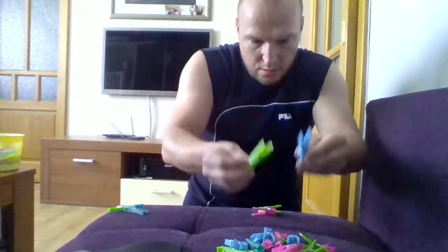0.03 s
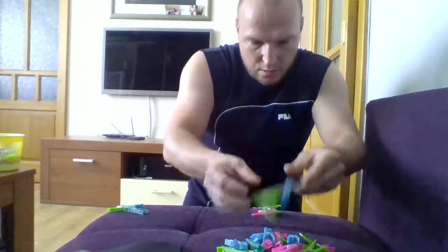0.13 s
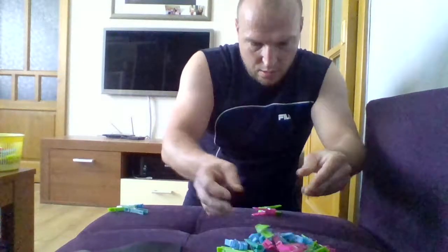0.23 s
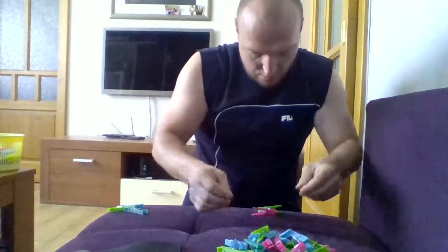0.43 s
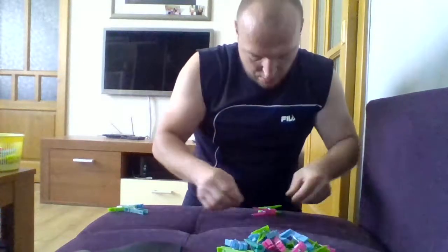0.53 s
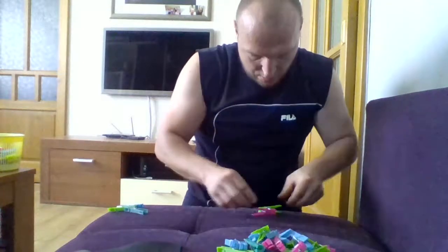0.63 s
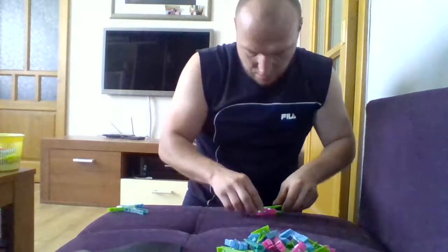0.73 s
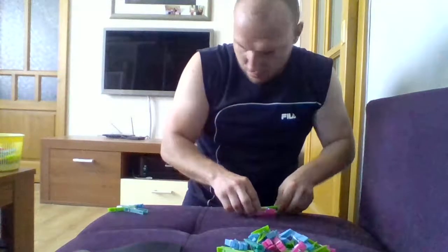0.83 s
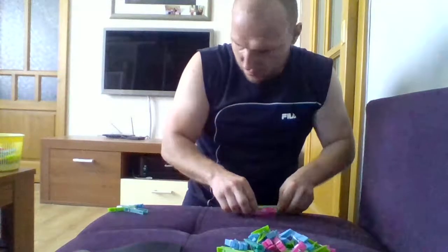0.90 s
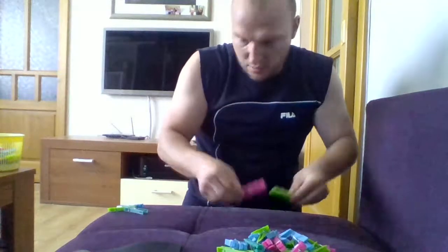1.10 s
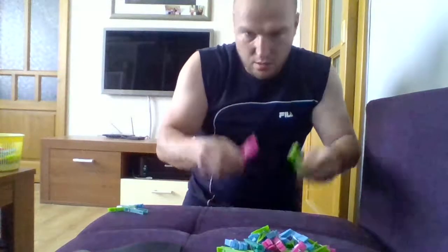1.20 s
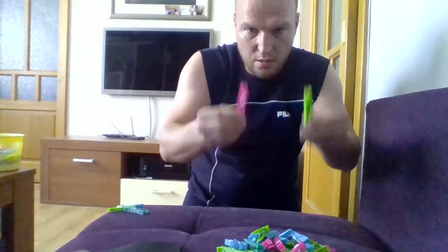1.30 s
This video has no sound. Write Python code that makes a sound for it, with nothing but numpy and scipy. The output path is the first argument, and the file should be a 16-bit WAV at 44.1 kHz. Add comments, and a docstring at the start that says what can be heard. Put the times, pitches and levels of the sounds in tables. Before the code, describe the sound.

Plastic clothes pegs fall onto a heap of pegs on a sofa. Faint hiss and low buzz come first, with tiny ticks at 0.15 seconds. From 0.20 to 0.25 a dense burst of hard, bright clacks rattles, with a dull cushion thud beneath. Weaker clicks follow until 0.39. A bright living-room tail and low murmur fade by about 0.7, leaving quiet hiss, heard through a small, dull-topped microphone.

```python
"""Plastic clothes pegs drop onto a heap of pegs on a sofa, a metre from a small camera microphone.
They clack and rattle as gritty contacts ring their modes; damped low sines make the cushion thud.
The living room answers with a bright tail of decaying noise bands, and low resonances murmur on.
Underneath lie a faint buzz of filtered pulses at the camera's frame rate, steady noise hiss,
whines of narrow-band noise and a few faint rings."""
import sys
import numpy as np
from scipy import signal
from scipy.io import wavfile

SR = 44100
rng = np.random.default_rng(int(sys.argv[2]) if len(sys.argv) > 2 else 0)


def unload_audio(sound):
    """Save the sound as a 16-bit wav file, at the path given as the first command line argument."""
    columns = np.transpose(np.atleast_2d(sound))
    # keep every value between -1 and 1, then stretch to whole-number steps
    steps = np.round(np.clip(columns, -1, 1) * 32767)
    wavfile.write(sys.argv[1], SR, steps.astype(np.int16))


N = 59535


def undb(db):
    """Decibels express an amplitude ratio as 20 times its logarithm."""
    return 10 ** (np.asarray(db) / 20)


def level(x, db):
    """The RMS amplitude is scaled to a level in dB."""
    return x * undb(db) / np.sqrt(np.mean(x ** 2))


def on_log(hz, table):
    """A table of frequency and value is interpolated along log frequency, as hearing spaces pitch."""
    table = np.array(table)
    return np.interp(np.log(hz), np.log(table[:, 0]), table[:, 1])


def fade(t, t60_s):
    """Exponential decay: the amplitude falls by 60 dB in each t60."""
    return np.exp(-np.log(1000) * t / t60_s)


def rise(t, rise_ms):
    """Exponential build-up towards full amplitude, with a time constant in ms."""
    return 1 - np.exp(-t * 1000 / rise_ms)


def add(out, at_s, x):
    """Superposition: sound pressures sum, here from a start time onwards."""
    i = int(at_s * SR)
    out[i:i + len(x)] += x[:len(out) - i]


def band(hz, size):
    """Band-limited noise: half an octave about a centre frequency, at unit RMS."""
    edges_hz = [hz / 2 ** (1 / 4), hz * 2 ** (1 / 4)]
    sos = signal.butter(2, edges_hz, "bandpass", fs=SR, output="sos")
    settle = 8192  # samples dropped while the filter settles
    return level(signal.sosfilt(sos, rng.standard_normal(size + settle))[settle:], 0)


BUZZ_HZ, BUZZ_DB, BUZZ_START_S = 30, -67, .0236
BUZZ_JITTER_MS, BUZZ_SCATTER_DB = 0.32, 0.98  # chance in each pulse's timing and level
BUZZ_DECAY_MS, BUZZ_LOW_HZ, BUZZ_HIGH_HZ = 2.4, 50, 150


def buzz():
    """Pulse train: a soft pulse leaks in once a frame; the steep bass cut smears it into a wobble."""
    lead_s = 1  # room ahead of the scene for the filters to settle
    count = int(N / SR * BUZZ_HZ) + 9
    chance, out = rng.standard_normal((count, 2)), np.zeros(N + 2 * SR)
    pulse = np.exp(-np.arange(SR // 50) / SR * 1000 / BUZZ_DECAY_MS)
    for k in range(count):
        jitter_s = BUZZ_JITTER_MS * chance[k, 0] / 1000
        at_s = lead_s + BUZZ_START_S + (k - 8) / BUZZ_HZ + jitter_s
        add(out, at_s, pulse * undb(BUZZ_SCATTER_DB * chance[k, 1]))
    out = signal.sosfilt(signal.butter(2, BUZZ_HIGH_HZ, fs=SR, output="sos"), out)
    out = signal.sosfilt(signal.butter(6, BUZZ_LOW_HZ, "high", fs=SR, output="sos"), out)
    return level(out[lead_s * SR:lead_s * SR + N], BUZZ_DB)


# Spectrum of the hiss. Each row: frequency in Hz, relative density in dB per Hz.
HISS = [(20, -4), (45, -1.5), (100, -1), (200, -2.5), (450, -11.5), (650, -22.5), (850, -18.5),
        (1100, -17.5), (1700, -19), (2300, -28.5), (3100, -24.5), (4000, -32.5), (6500, -30.5),
        (7600, -33.5)]
HISS_DB = -78.5


def hiss():
    """Shaped noise: half-octave bands of steady room and circuit noise, wider bands carrying more power."""
    out = np.zeros(N)
    for hz in 30 * 2 ** (np.arange(17) / 2):
        density = undb(on_log(hz, HISS))
        out += density * np.sqrt(hz) * band(hz, N)  # bandwidth grows with hz
    return level(out, HISS_DB)


# Narrow steady bands in the hiss. Each row: frequency in Hz, width in Hz, level in dB.
WHINES = [(860, 70, -98), (1680, 120, -101), (2613, 25, -106), (3151, 8, -106), (4850, 6, -114)]


def whines():
    """Resonant filtering: noise through a narrow peak becomes a faint, breathy, steady whine."""
    out = np.zeros(N)
    for hz, width_hz, db in WHINES:
        b, a = signal.iirpeak(hz, hz / width_hz, fs=SR)
        out += level(signal.lfilter(b, a, rng.standard_normal(N)), db)
    return out


def damped_modes(table):
    """Damped oscillation: each row sounds one decaying sine with a soft rise."""
    out, t = np.zeros(N), np.arange(SR // 2) / SR
    for at_s, db, hz, t60_ms in table:
        envelope = rise(t, 2.3) * fade(t, t60_ms / 1000)
        add(out, at_s, -undb(db) * envelope * np.sin(2 * np.pi * hz * t))
    return out


# Faint rings somewhere in the room.
# Each row: start in seconds, amplitude before rise and decay in dB, frequency in Hz, t60 in ms.
RINGS = [(.068, -74, 1770, 85), (.068, -64, 2793, 16), (.07, -79, 432.8, 540), (.505, -75.5, 1730, 80),
         (.755, -78, 1655, 60), (1.045, -76.5, 847, 180)]


def faint_rings():
    """Free vibration: each ring is a single damped mode."""
    return damped_modes(RINGS)


# Peg-on-peg clacks. Each row: start in seconds, RMS level in dB if packed into the rattle length,
# pitch of the favoured ring in Hz, rattle length in ms, weight of the low modes in dB.
CLACKS = [(0.1527, -57.5, 2565, 1.4, -19.5), (.1535, -54, 3350, 2.0, -21), (0.1531, -47, 7000, 2.5, -19.5),
          (0.154, -48, 5900, 2.3, -22.5), (0.2006, -22, 7100, 0.69, -9.5), (0.2027, -20.5, 4700, 1.2, -3),
          (0.2045, -24, 6300, .6, 1.5), (0.2065, -37, 6500, 1.7, 1), (.2120, -27.5, 6600, 1.3, 6),
          (.2140, -29, 4500, 1.2, 7.5), (0.2152, -33, 6800, 1.0, -1), (0.222, -20.5, 6900, .9, 8),
          (.2300, -35, 5500, 1.1, -4.5), (0.2355, -24.5, 6200, 0.54, -6), (0.2399, -40, 5000, 1.9, -3),
          (.2470, -36.5, 3300, 0.96, -9.5), (0.314, -41, 6300, 1.3, -25), (0.3549, -46.5, 4800, 2, 2),
          (0.3888, -51, 6250, 3, -4.5), (0.393, -70, 6200, 0.84, -14.5)]
# Modes of a peg. Each row: frequency in Hz, relative level in dB, t60 in ms.
PEG = [(850, -46.5, 16.1), (1270, -21, 11.4), (1578.5, -17.5, 16), (2200, -28, 14), (2790, -11, 11),
       (3557, -7.5, 4.9), (4150, -5.5, 6.8), (4753, -2.5, 8), (5750, 2.5, 4), (6320, -4, 24),
       (6610, 1, 2.5), (6835, -2.5, 4.1)]
FAVOUR_DB, FAVOUR_OCT = 9, .18  # lift of the modes near a clack's pitch, and its reach in octaves
SCATTER_DB, DETUNE = 2, 0.025  # chance in each mode's level and, as a fraction, its frequency
LOW_MODES_HZ = 2400


def pegs():
    """Modal excitation: a brief gritty contact rings the peg's modes, favouring those near its pitch."""
    out, t = np.zeros(N), np.arange(SR // 20) / SR
    hz, db, t60_ms = np.array(PEG).T[:, :, None]
    for at_s, level_db, pitch_hz, rattle_ms, low_db in CLACKS:
        level_chance, pitch_chance = rng.standard_normal((2, len(PEG), 1))
        octaves_off = np.log2(hz / pitch_hz)
        favour_db = FAVOUR_DB * np.exp(-(octaves_off / FAVOUR_OCT) ** 2)
        size = undb(db + favour_db + SCATTER_DB * level_chance + low_db * (hz < LOW_MODES_HZ))

        envelope = fade(t, t60_ms / 1000) * (1 - fade(t, 0.0014))
        rings = envelope * np.sin(2 * np.pi * hz * (1 + DETUNE * pitch_chance) * t)
        contact = rng.standard_normal(len(t)) * t * np.exp(-2000 * t / rattle_ms)
        each = signal.fftconvolve(contact[None], rings)[:, :len(t)]
        each = each / np.sqrt(np.sum(each ** 2, axis=1, keepdims=True))  # equal energy per mode
        clack = (size * each).sum(0)
        share = rattle_ms / 1000 * SR / len(t)  # a longer rattle carries more energy
        add(out, at_s, level(clack, level_db) * np.sqrt(share))
    return out


# Colour of the room's tail. Each row: frequency in Hz, relative density in dB per Hz.
ROOM = [(250, -0.5), (480, -2), (700, -7.5), (1300, 5), (2500, 1), (4000, 2), (5200, -11.5), (7400, -5.5)]
# Ring time of the room before the extra fade. Each row: frequency in Hz, t60 in seconds.
ROOM_T60 = [(300, 0.8), (1000, 0.38), (3000, 0.63), (5000, 0.63), (7200, 0.52)]
ROOM_DB, ROOM_DELAY_MS, ROOM_RISE_MS = -6, 3, 2.7
FADE_DB_PER_S3 = 901.5  # extra fade with time cubed: the tail falls ever faster


def room(dry):
    """Reverberation: dense echoes build up over a few milliseconds and die away band by band."""
    t = np.arange(SR // 2) / SR
    tail = np.zeros(len(t))
    for hz in 200 * 2 ** (np.arange(12) / 2):
        noise = undb(on_log(hz, ROOM)) * np.sqrt(hz) * band(hz, len(t))
        tail += noise * fade(t, on_log(hz, ROOM_T60))
    tail = tail * rise(t, ROOM_RISE_MS) * undb(-FADE_DB_PER_S3 * t ** 3)
    tail = undb(ROOM_DB) * tail / np.sqrt(np.sum(tail ** 2))  # energy of the whole tail
    out = np.zeros(N)
    add(out, ROOM_DELAY_MS / 1000, signal.fftconvolve(dry, tail))
    return out


# Low resonances of sofa and room.
# Each row: frequency in Hz, width in Hz, RMS level before rise and decay in dB, t60 in seconds.
MURMUR = [(42, 24, -61, .9), (110, 77, -61.5, 1), (280, 100, -63, 0.89), (462, 111, -61, 0.92),
          (910, 270, -60.5, 0.55)]
MURMUR_START_S, MURMUR_RISE_MS = 0.19, 23


def murmur():
    """Resonance: noise in a few broad low bands swells with the drop and fades for half a second."""
    out, t = np.zeros(N), np.arange(SR // 2) / SR
    for hz, width_hz, db, t60_s in MURMUR:
        edges_hz = [hz - width_hz / 2, hz + width_hz / 2]
        sos = signal.butter(2, edges_hz, "bandpass", fs=SR, output="sos")
        noise = level(signal.sosfilt(sos, rng.standard_normal(len(t))), db)
        add(out, MURMUR_START_S, noise * rise(t, MURMUR_RISE_MS) * fade(t, t60_s))
    return out


# Dull knocks in cushion and frame.
# Each row: start in seconds, amplitude before rise and decay in dB, frequency in Hz, t60 in ms.
THUDS = [(.201, -48.5, 378.4, 140), (.2250, -43.5, 97, 150), (.236, -56, 180, 60), (.262, -60.5, 42.7, 650),
         (.292, -60, 301.7, 390), (.30, -51.5, 48, 120), (.405, -75.5, 42, 92)]


def thuds():
    """Impulse response: each knock sets off a single damped mode."""
    return damped_modes(THUDS)


def scene():
    """Superposition: all sources and the room's answer to the pegs sum, alike in both channels."""
    struck = pegs()
    background = buzz() + hiss() + whines() + faint_rings()
    mono = background + struck + room(struck) + murmur() + thuds()
    return np.array([mono, mono])


BAND_HZ, TOP_HZ = 7500, 8716


def record(dry):
    """Band limiting: a speech-band microphone cuts sharply and symmetrically, then the top is removed."""
    taps = signal.firwin(301, BAND_HZ, window=("kaiser", 3.2), fs=SR)
    x = signal.fftconvolve(dry, taps[None], mode="same")
    return signal.sosfilt(signal.ellip(8, .2, 70, TOP_HZ, fs=SR, output="sos"), x)


dry = scene()
out = record(dry)
unload_audio(out)
```